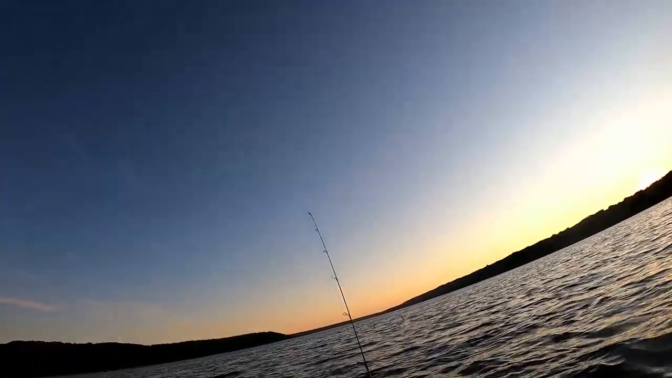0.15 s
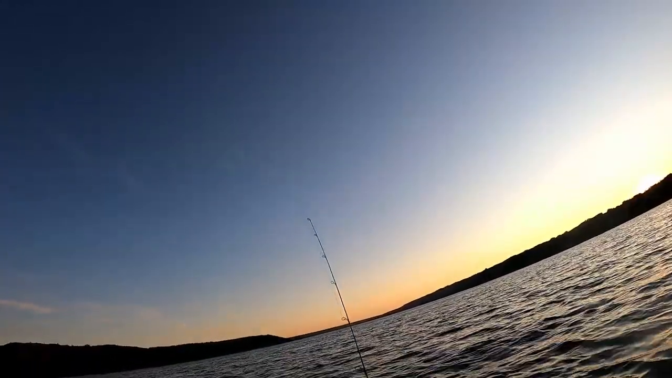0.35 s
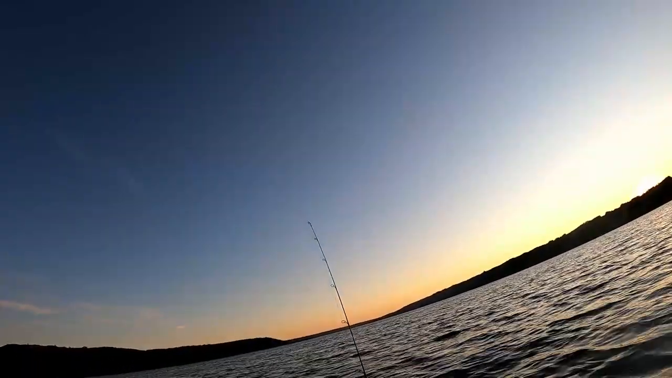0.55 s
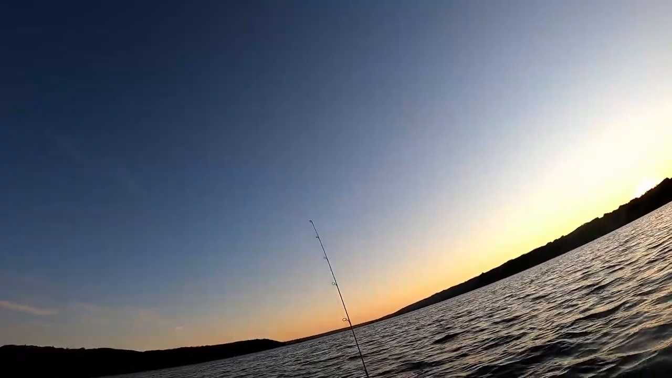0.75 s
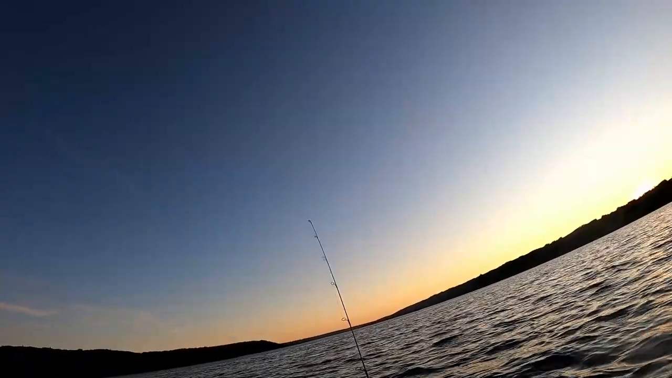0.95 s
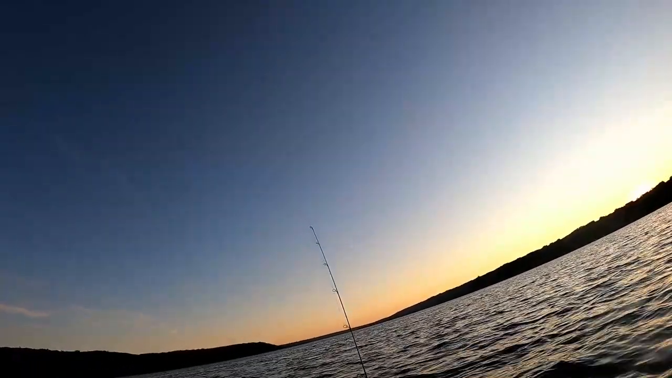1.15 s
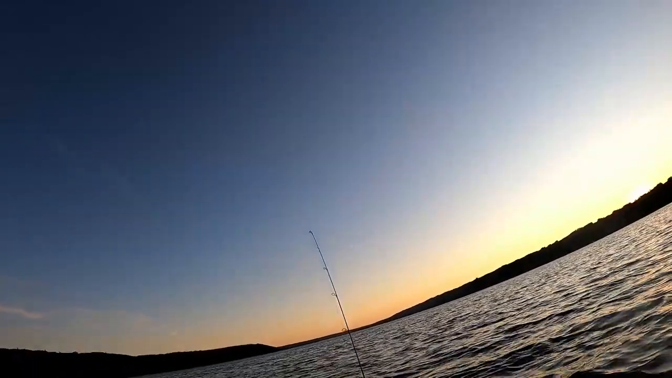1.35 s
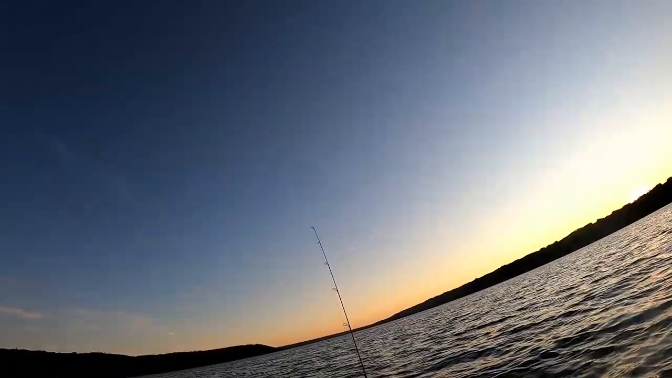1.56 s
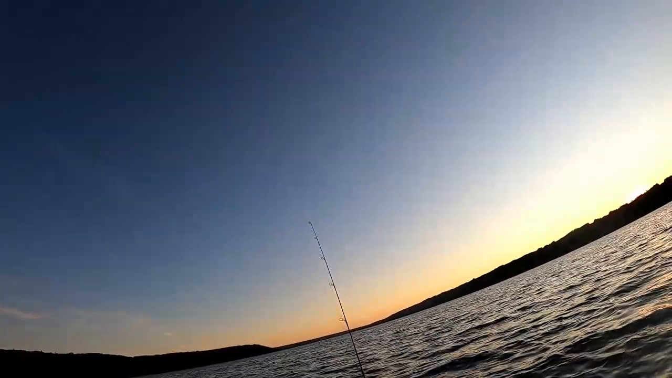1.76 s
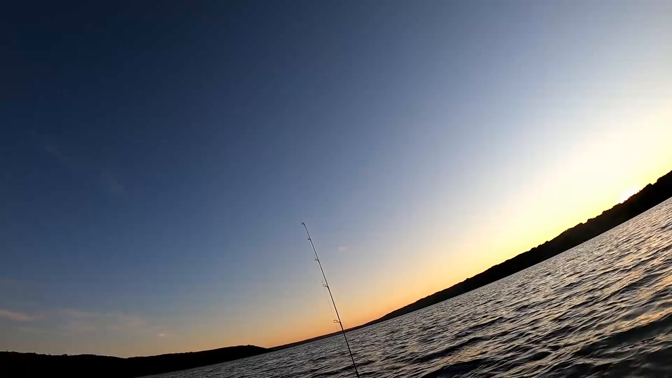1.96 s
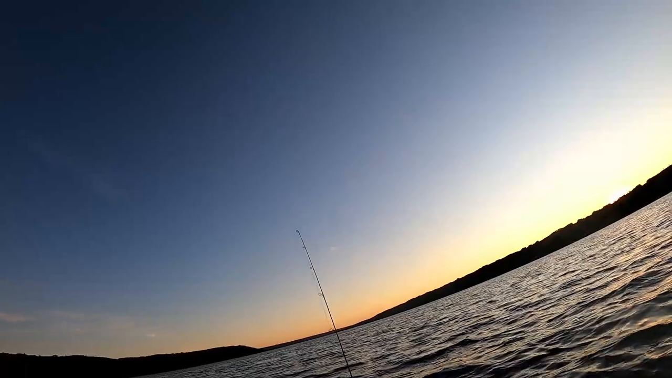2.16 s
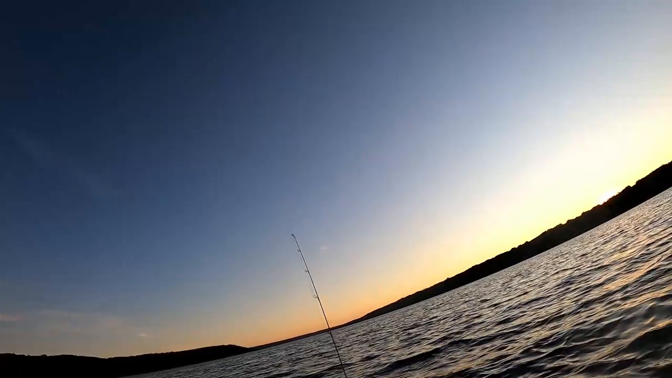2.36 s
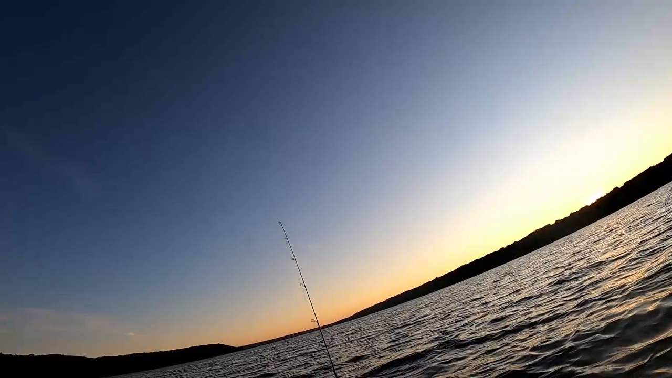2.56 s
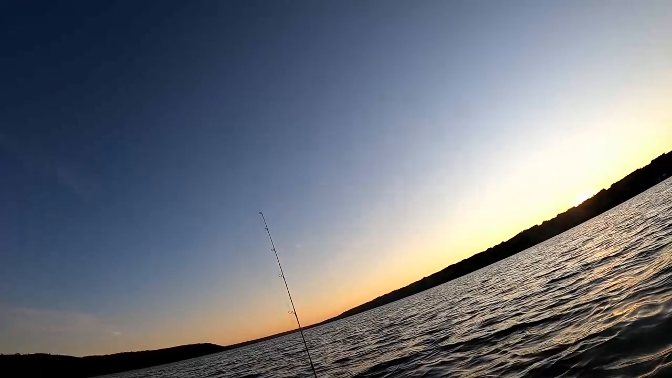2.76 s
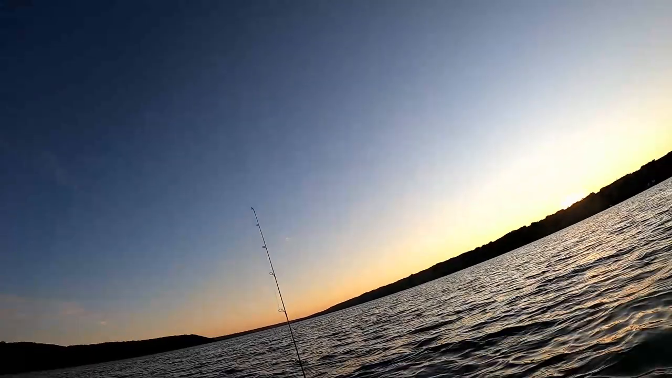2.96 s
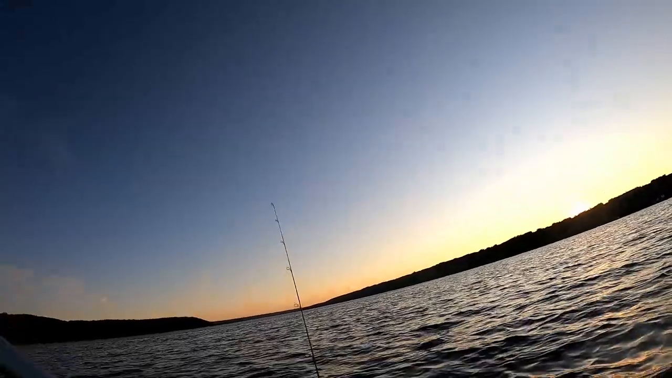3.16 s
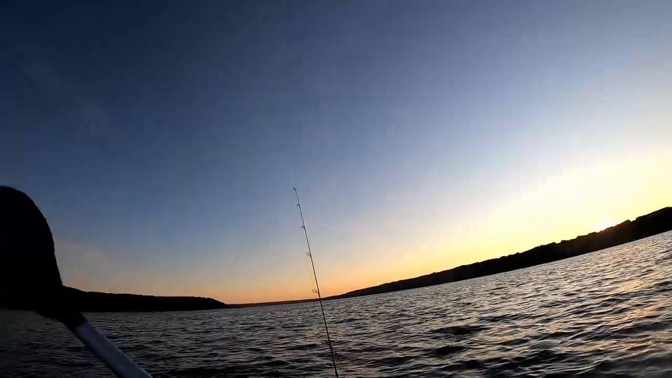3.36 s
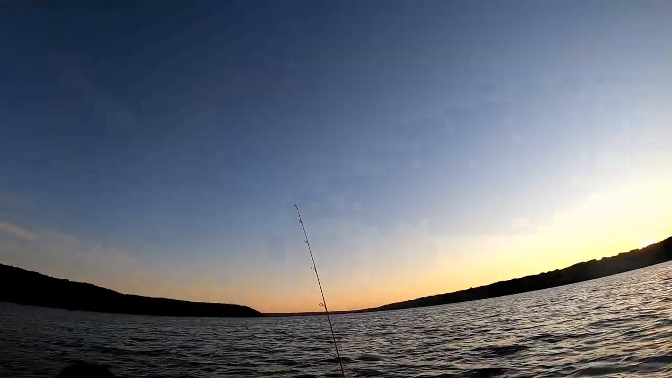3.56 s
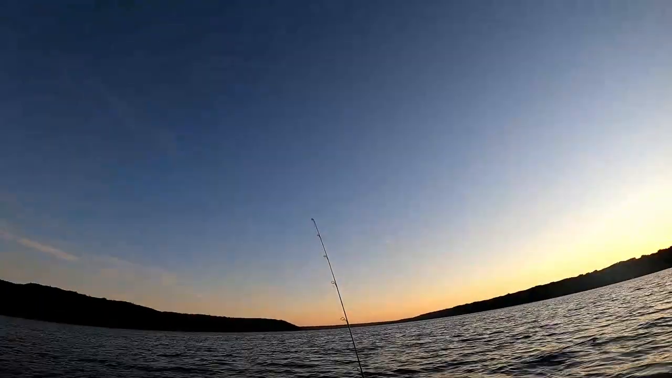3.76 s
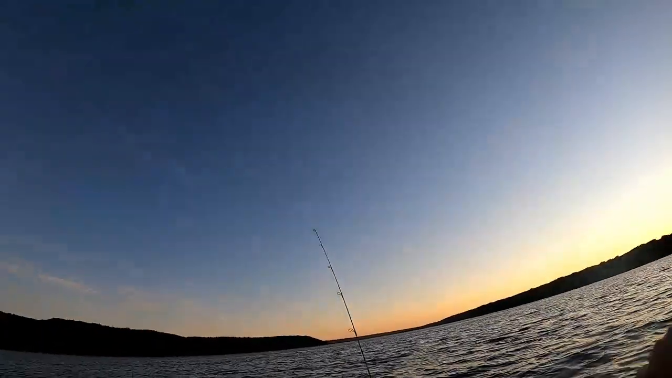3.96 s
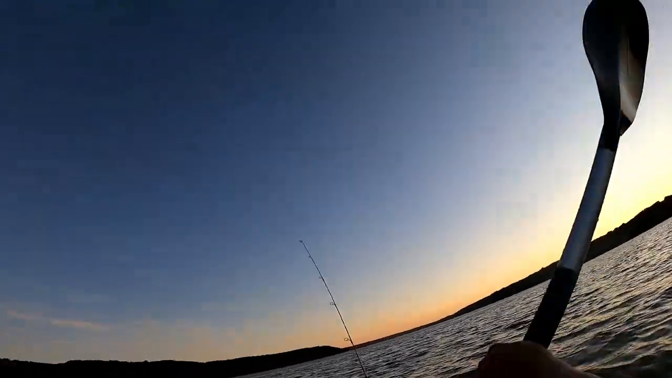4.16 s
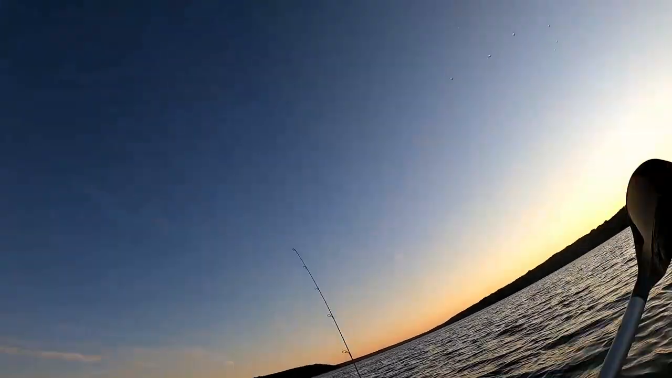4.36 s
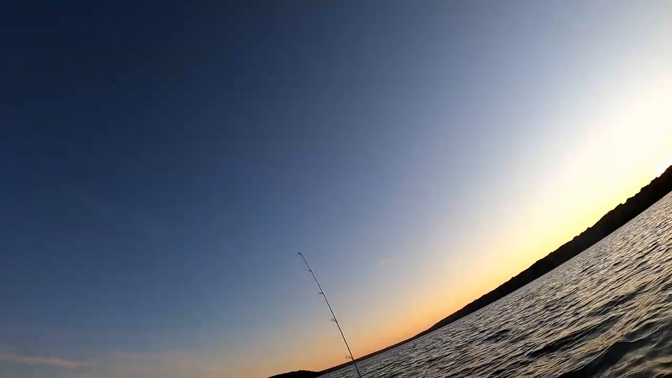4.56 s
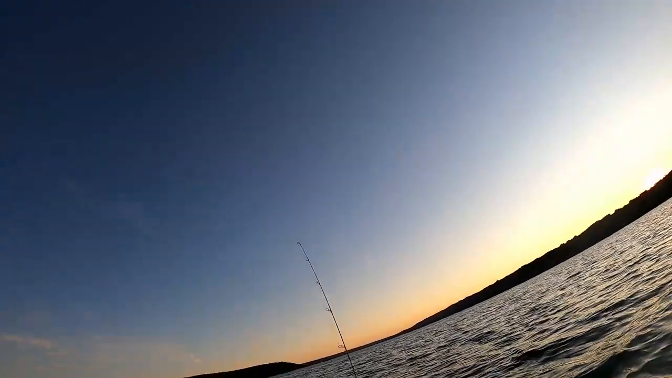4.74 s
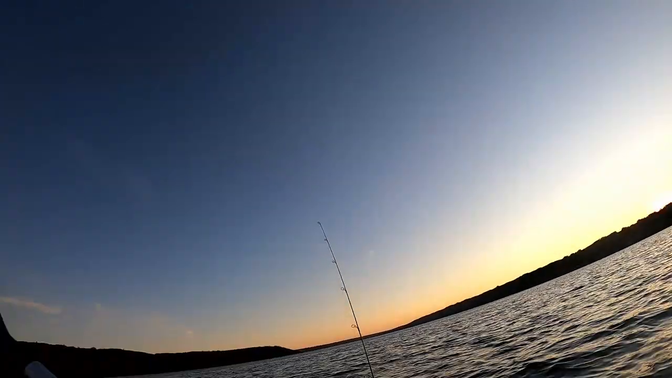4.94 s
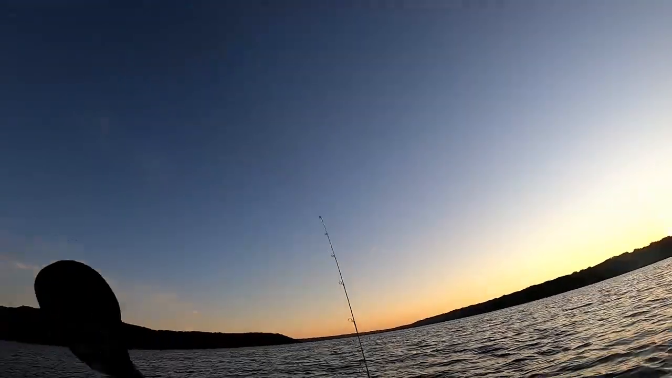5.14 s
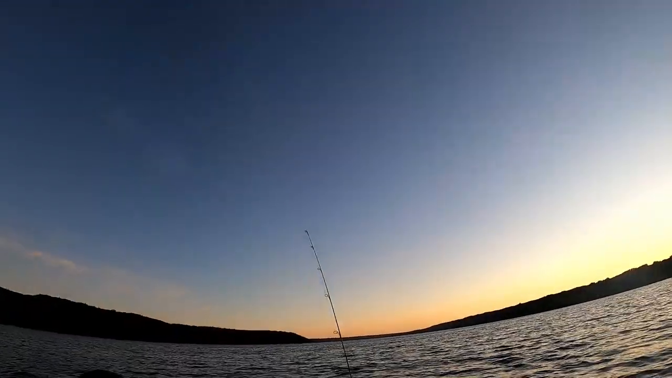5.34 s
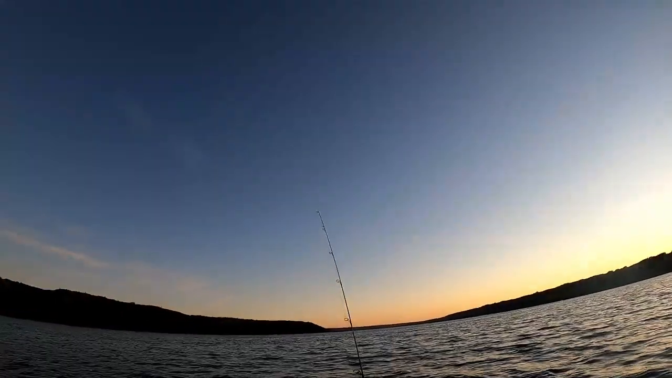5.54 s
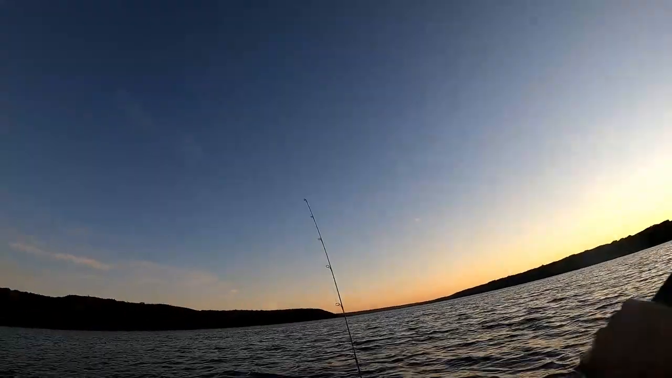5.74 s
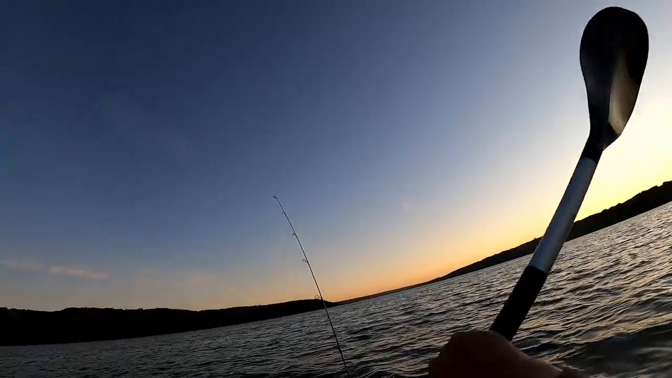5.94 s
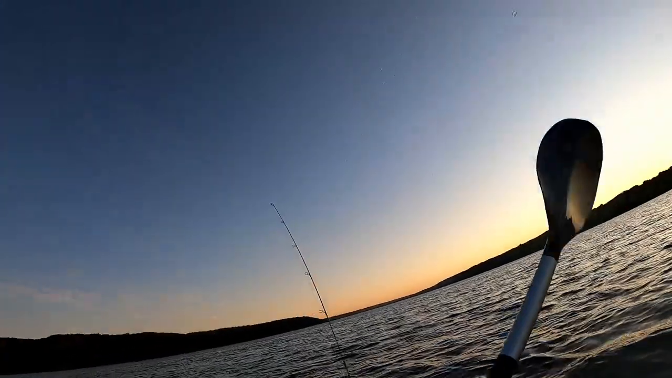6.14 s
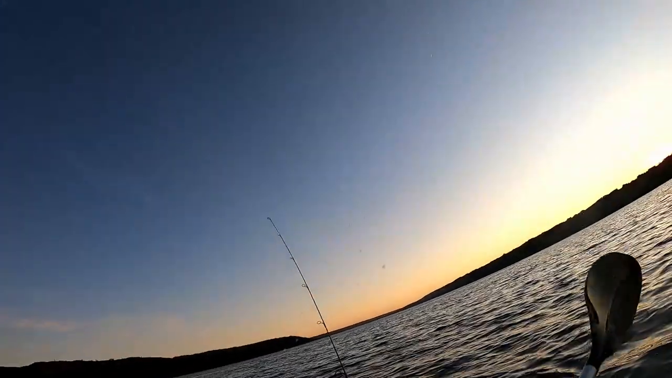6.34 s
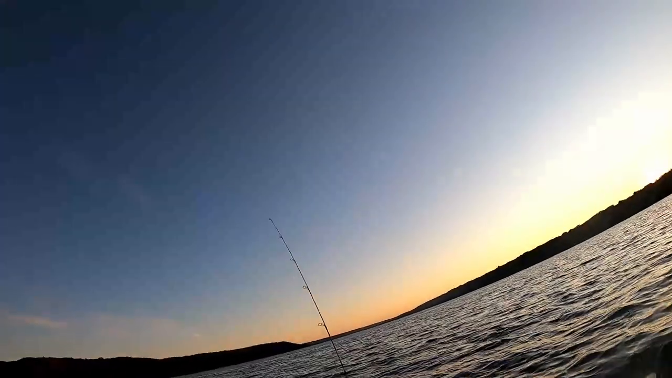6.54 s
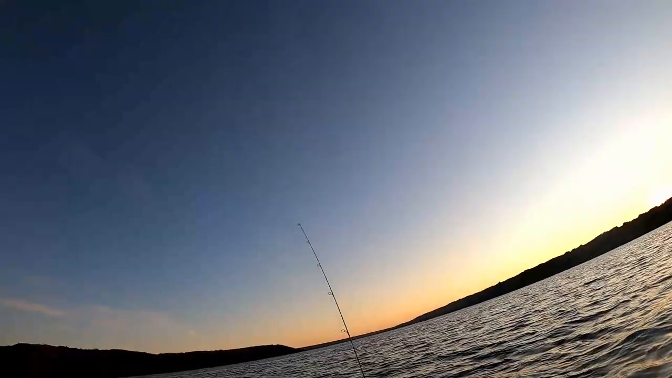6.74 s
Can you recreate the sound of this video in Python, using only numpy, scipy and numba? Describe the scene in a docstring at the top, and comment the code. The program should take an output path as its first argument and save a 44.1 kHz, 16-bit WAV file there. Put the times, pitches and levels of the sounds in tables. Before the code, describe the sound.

A close, slightly dull mono microphone rides on a small inflatable boat on open choppy water, with no echo. From 0 to 3 seconds it drifts quietly: low lumpy wind rumble, faint distant waves, a thin trickle, light drop ticks, and small wavelets lapping with rising bubble plinks. Soft slaps come near 1.3 seconds and a clearer hollow plop at 2.5. Very faint, thin bird whistles sound near 2.0 and 3.1. At 3.25 a slap begins the paddling, and the level jumps. Four strokes surge at roughly 3.8, 4.6, 5.5 and 6.2 seconds, each a deep gurgling churn with fizzy spray, plops and bright drops; drips and knocks fill the easing between them. Wind thumps hard around 4.3 to 4.7 and flutters heavily from 6.0 to 6.8. A strong slap lands at 6.4, then bubbling water continues to the end.

```python
"""Inflatable boat on a choppy lake

Dusk on open water, the microphone aboard a small inflatable that drifts, then is paddled: four strokes.
Wind on the microphone is low noise in lumps; churn and spray are swarms of ringing bubbles over noise.
Close by, lone bubbles ring as gliding sines; drops tick and wavelets slap as short bursts of noise.
Behind them drips trickle, far waves are steady banded noise, and a far bird whistles faint sine notes."""
import sys
import numpy as np
from scipy import signal
from scipy.io import wavfile
from numba import njit

SR = 44100
rng = np.random.default_rng(int(sys.argv[2]) if len(sys.argv) > 2 else 0)


def master(y):
    """Save y as 16-bit WAV."""
    cut = np.clip(np.atleast_2d(y).T, -1, 1)
    pcm = np.round(cut * 32767)  # scale
    wavfile.write(sys.argv[1], SR, pcm.astype(np.int16))


def invert_db(level):
    """Linear amplitude ratio for a level in decibels (20 dB per decade), elementwise."""
    return 10 ** (np.asarray(level, dtype=float) / 20)


N = 304290      # samples
STEP = 40       # samples between points of slow curves


def rms_one(x):
    """Scale to rms 1."""
    return x / np.sqrt(np.mean(x ** 2) + 1e-20)


def in_time(rows):
    """Columns of a curve table at every sample."""
    s, *columns = np.transpose(rows)
    return [np.interp(np.arange(N) / SR, s, column) for column in columns]


def at_hz(spectrum, hz):
    """Read a spectrum on a log-frequency axis."""
    table_hz, table_db = np.transpose(spectrum)
    return np.interp(np.log(hz), np.log(table_hz), table_db)


def drift(rate_hz):
    """Slow random wander of spread 1: noise smoothed by two equal one-pole low-passes."""
    pole = np.exp(-2 * np.pi * rate_hz * STEP / SR)
    noise = rng.standard_normal(N // STEP + 2002)
    slow = signal.lfilter([1], [1, -2 * pole, pole ** 2], noise)[2000:]      # settled part
    return np.interp(np.arange(N) / STEP, np.arange(len(slow)), rms_one(slow))


def swells(steady_db, s, held, db, rise_db_per_s, fall_db_per_s):
    """Level in dB of events that rise, hold and fall away, their power added to a steady level."""
    t = np.arange(0, N, STEP)[:, None] / SR
    before, after = np.maximum(s - t, 0), np.maximum(t - s - held, 0)
    shape_db = db - rise_db_per_s * before - fall_db_per_s * after
    power = np.interp(np.arange(N) / SR, t[:, 0], (invert_db(shape_db) ** 2).sum(axis=1))
    return 10 * np.log10(power + invert_db(steady_db) ** 2)


def banded_noise(spectrum, together_db, patchy_db, rate_hz):
    """Half-octave noise bands that flicker partly together, partly alone; rms 1."""
    out, together = 0, drift(rate_hz)
    lowest, highest = spectrum[0][0], spectrum[-1][0]
    edges = lowest * 2 ** np.arange(0, np.log2(highest / lowest) + .25, .5)
    white = rng.standard_normal((2, N + 8000))      # neighbouring bands take different noise
    for k, (low, high) in enumerate(zip(edges, edges[1:])):
        band_pass = signal.butter(2, [low, min(high, .45 * SR)], "band", fs=SR, output="sos")
        band = signal.sosfilt(band_pass, white[k % 2])[8000:]
        flicker_db = together_db * together + patchy_db * drift(rate_hz)
        out = out + band * invert_db(at_hz(spectrum, np.sqrt(low * high)) + flicker_db)
    return rms_one(out)


@njit
def ring_bubbles(out, at, height, hz, glide, ring_s, attack_cycles):
    """Each bubble is a sine that swells in a cycle or two, dies away and glides in pitch."""
    for k in range(len(at)):
        phase, sixth = 0., ring_s[k] * SR / 6
        for i in range(min(int(4 * sixth), len(out) - at[k])):
            age = i / sixth      # in sixths of the ring setting
            phase += 2 * np.pi * hz[k] * (1 + (glide[k] - 1) * min(age, 2.)) / SR
            swell = 1 - np.exp(-phase / (2 * np.pi * attack_cycles))
            decay = np.exp(-.7 * age - .45 * age ** 2)
            out[at[k] + i] += height[k] * swell * decay * np.sin(phase)


def swarm(per_s, spectrum, cycles, spread_db, rise):
    """Random bubbles at a changing rate, evened in local level, pitches spread over a spectrum; rms 1."""
    at = np.flatnonzero(rng.random(N) < per_s / SR)
    pitch, size, bend, length = rng.random((N, 4))[at].T
    lowest, highest = spectrum[0][0], spectrum[-1][0]
    hz = lowest * (highest / lowest) ** pitch
    # equal chance per octave, so the level per Hz needs 20 log10(hz) to follow the spectrum
    size_db = at_hz(spectrum, hz) + 20 * np.log10(hz) - spread_db * np.log(np.maximum(size, .03))
    out = np.zeros(N)
    ring_s = cycles * (0.27 + length) / hz
    ring_bubbles(out, at, invert_db(size_db) / np.sqrt(per_s[at]), hz, 1 + rise * bend, ring_s, .8)
    return rms_one(out)


def bursts(rows, t60, width):
    """Knocks with noise dying 60 dB in t60 s, in a band from centre / width to centre * width."""
    out, age = np.zeros(N), np.arange(int(.1 * SR)) / SR
    for (s, db, hz), noise in zip(rows, rng.standard_normal((len(rows), len(age)))):
        band = signal.butter(3, [hz / width, min(hz * width, .45 * SR)], "band", fs=SR, output="sos")
        contact = 1.2 * np.sqrt(SR / hz) * (age == 0)      # one sharp click
        splatter = noise * invert_db(-60 * age / t60)
        burst = signal.sosfilt(band, contact + splatter)
        at = round(s * SR)
        out[at:at + len(age)] += invert_db(db) * burst[:N - at] / np.abs(burst).max()
    return out


# light air on the microphone: (frequency [Hz], relative level per Hz [dB])
RUMBLE = [(20, 1), (50, -0.5), (100, -5.5), (200, -16.5), (340, -36.5), (450, -40)]
# strong gusts on the microphone: (frequency [Hz], relative level per Hz [dB])
FLUTTER = [(40, -25.5), (85, 6), (140, 3.5), (210, 0), (300, -8.5), (450, -20.5)]
# gusts over the light air, before eddies: (time at full strength [s], held [s], level [dB])
GUSTS = [(0.0, 0.071, -37.5), (0.27, 0.03, -35.5), (0.58, 0.19, -38), (1.3, .22, -34.5), (1.72, 0.084, -37),
         (1.94, 0.033, -33), (2.04, 0.14, -34.5), (2.2, 0.15, -35), (2.45, 0.046, -33), (2.71, 0.039, -44),
         (3.1, 0.056, -38), (3.3, 0.18, -43), (3.76, 0.033, -31), (4.05, 0.086, -37), (4.31, 0.17, -20.5),
         (4.527, 0.054, -11), (4.64, 0.095, -20), (5.02, 0.015, -30.5), (5.2, .25, -44),
         (5.55, 0.068, -31.5), (5.76, 0.069, -34), (6.04, 0.14, -21), (6.12, 0.15, -18),
         (6.32, 0.014, -18.5), (6.48, 0.14, -17.5), (6.6, 0.22, -21.5)]


def wind():
    """Eddies on the port: lumpy rumble; the stronger the gust, the more of it is faster flutter."""
    wind_db = swells(-40.5, *np.transpose(GUSTS), rise_db_per_s=237, fall_db_per_s=209)
    gusty = 1 / (2.0 + np.exp(-(wind_db + 19.5) / 6.4))      # 0 in light air, towards 0.5 in gusts
    eddies = invert_db(1.87 * drift(27.6))      # each passing eddy moves rumble and flutter in level together
    rumble = banded_noise(RUMBLE, together_db=0.6, patchy_db=3.5, rate_hz=10.2)
    flutter = banded_noise(FLUTTER, together_db=3.0, patchy_db=3.5, rate_hz=16.3)
    return invert_db(wind_db) * eddies * (invert_db(-9.5 * gusty) * rumble + invert_db(3.5) * gusty * flutter)


# low bubbling at the hull: (frequency [Hz], relative level per Hz [dB])
GURGLE = [(150, 8), (250, 3), (420, 2.5), (900, -0.5), (1800, -14.5), (2800, -85)]
# fine spray: (frequency [Hz], relative level per Hz [dB])
SPRAY = [(1200, 5), (2200, 0), (4600, -8), (7000, -18.5), (9500, -17), (12600, -29.5), (15000, -80)]
# slow churn, calm and then four paddle strokes: (time [s], gurgle level [dB], spray level [dB])
CHURN = [(0.0, -53, -61), (0.6, -60, -67.5), (1.15, -64.5, -78), (2.2, -68.5, -92), (2.8, -58, -72.5),
         (3.2, -70, -67), (3.4, -50.5, -67), (3.48, -51, -47.5), (3.74, -31.5, -47), (3.96, -31, -46.5),
         (4.06, -36.5, -46.5), (4.27, -38.5, -48), (4.58, -29, -39.5), (5.03, -42.5, -42.5),
         (5.15, -43.5, -50), (5.34, -35, -43.5), (5.57, -30.5, -50), (5.75, -34.5, -45.5),
         (6.02, -46.5, -57.5), (6.11, -38.5, -40), (6.23, -29.5, -34.5), (6.47, -31, -44),
         (6.8, -36.5, -37.5), (6.9, -45.5, -50.5)]
# single wavelets and splashes breaking on the hull:
# (time at full strength [s], held [s], gurgle level [dB], spray level [dB])
WAVELETS = [(0.138, 0.034, -46, -60), (0.75, 0.052, -52.5, -68.5), (0.89, 0.02, -70, -64.5),
            (1.231, 0.007, -46.5, -62.5), (1.34, 0.046, -42.5, -54.5), (1.556, 0.052, -47.5, -61.5),
            (1.918, 0.02, -56, -72), (2.29, 0.0069, -54, -68), (2.395, 0.022, -47.5, -60.5),
            (2.478, 0.015, -38, -54), (2.719, 0.013, -53, -57), (2.87, 0.11, -57, -81),
            (3.252, 0.039, -35, -48), (4.124, 0.02, -34.5, -44.5), (4.549, 0.016, -39, -65),
            (4.857, 0.0082, -32, -41), (5.113, 0.017, -38.5, -49), (5.917, 0.032, -41.5, -43),
            (6.41, 0.0099, -30, -65)]


def water():
    """The harder the churn, the more bubbles a second; many small ones blur into wash and hiss."""
    gurgle_db, spray_db = in_time(CHURN)
    s, held, gulp_db, splash_db = np.transpose(WAVELETS)
    gurgle_db = swells(gurgle_db, s, held, gulp_db, rise_db_per_s=510, fall_db_per_s=241.5)
    spray_db = swells(spray_db, s, held, splash_db, rise_db_per_s=400, fall_db_per_s=190)
    clumps = invert_db(2.7 * drift(20))
    clump_level = np.sqrt(clumps)      # a clump of bubbles is louder than a lull

    gurgles_per_s = 1300 * invert_db(.3 * (gurgle_db + 40)) * clumps
    gurgle = swarm(gurgles_per_s, GURGLE, cycles=30, spread_db=4.0, rise=.25)
    wash = banded_noise(GURGLE, together_db=2.0, patchy_db=5.5, rate_hz=18.0)
    churn = invert_db(-1.5) * gurgle * clump_level + invert_db(-12.5) * wash

    fizz_per_s = 2600 * invert_db(.4 * (spray_db + 50)) * clumps
    fizz = swarm(fizz_per_s, SPRAY, cycles=24, spread_db=4.1, rise=.2)
    # the smallest bubbles are faint
    fizz = signal.sosfilt(signal.butter(1, 5000, fs=SR, output="sos"), fizz)
    hiss = banded_noise(SPRAY, together_db=2.0, patchy_db=4.0, rate_hz=23.4)
    spray = invert_db(-2.5) * fizz * clump_level + invert_db(-2.5) * hiss
    return invert_db(gurgle_db) * churn + invert_db(spray_db) * spray


# steady trickle off the tubes: (frequency [Hz], relative level per Hz [dB])
DRIPS = [(1000, 11), (1400, 4.5), (2500, -5), (4500, -13)]


def trickle():
    """Small drips ring as bubbles that come in short runs, denser and louder together."""
    runs = invert_db(5.5 * drift(7.9))
    return invert_db(-73) * np.sqrt(runs) * swarm(130 * runs, DRIPS, cycles=50, spread_db=3.5, rise=.12)


# far waves across the lake: (frequency [Hz], relative level per Hz [dB])
LAKE = [(300, 26), (505, -10), (1009, -12), (1427, 3), (2018, -17), (3400, -19), (8200, -20), (10200, -49),
        (15000, -49)]


def lake():
    """Far waves blend into a faint, gently flickering noise."""
    return invert_db(-66) * banded_noise(LAKE, together_db=1.5, patchy_db=1.4, rate_hz=6)


# drops on the taut skin, close by: (time [s], peak level [dB], centre [octaves above 1 kHz])
TICKS = [(0.049, -47, 2.5), (0.142, -35, 0.76), (0.2, -38, 0.68), (0.28, -46, 1.5), (0.512, -58, 2.5),
         (0.571, -52, 2.7), (0.884, -40, 0.72), (1.233, -35, 0.94), (1.6106, -45.5, 2.17),
         (1.764, -48, 1.4), (2.389, -41, 0.68), (2.675, -50, 2.5), (2.6908, -49, 1.9), (2.7156, -32, 1.05),
         (2.7262, -39, 2.3), (2.761, -47.5, 2.2), (3.876, -29, 0.99), (4.2028, -27, 1.14),
         (4.805, -23.5, 1.1), (4.898, -25, 1.2), (4.974, -29.5, 2.5), (5.029, -23.5, 1.2),
         (5.313, -30, 1.75), (5.576, -25, 1.2), (5.91, -25.5, 2.1), (5.915, -27, 2.9), (5.9205, -28.5, 1.2),
         (6.083, -30.5, 2.64), (6.2198, -19, 1.88)]


def ticks():
    """Drops strike the taut skin: very short, bright knocks."""
    rows = [(s, db, 1000 * 2 ** octaves) for s, db, octaves in TICKS]
    return bursts(rows, t60=.012, width=1.6)


# bubbles heard alone: (time [s], level before swell and decay [dB], starting pitch [Hz],
# pitch ratio a sixth into the ring [-], ring [s]); the glide ends at two sixths with twice the change,
# and the decay passes 60 dB at just over half the ring
BUBBLES = [(0.164, -38, 444, 1.18, 0.42), (0.279, -40, 1220, 1.1, 0.037), (0.557, -43, 1370, 1, 0.057),
           (0.719, -45.5, 1740, 1.07, 0.065), (0.885, -42, 1250, 1.2, 0.039),
           (0.958, -46, 1157, 1.06, 0.097), (1.307, -41, 1120, 1.03, 0.077), (1.427, -39, 1740, 0.98, 0.03),
           (1.444, -37.5, 830, 1.9, 0.055), (1.562, -41, 1430, 1.12, 0.043),
           (1.592, -44, 1550, 1.13, 0.058), (1.714, -42.5, 1480, 0.89, 0.02), (1.762, -57, 870, 1.15, 0.2),
           (1.934, -47.5, 1380, 0.99, 0.048), (1.952, -50, 884, 1.35, 0.18), (2.466, -17, 422, 0.89, 0.036),
           (2.509, -26, 1040, 1.3, 0.022), (2.694, -42.5, 1070, 1.03, 0.055), (2.73, -33, 1730, 1, 0.013),
           (2.763, -37.5, 2270, 1.25, 0.033), (2.866, -42.5, 1360, 1.02, 0.044),
           (2.904, -44.5, 1550, 1.33, 0.058), (3.31, -24.5, 620, 1.12, 0.07), (3.411, -42, 780, 1.23, 0.25),
           (3.47, -36.5, 1350, 2, 0.095), (3.52, -31, 1640, 1.16, 0.047), (3.611, -30, 950, 1.55, 0.064),
           (3.777, -25.5, 938, 0.95, 0.11), (3.799, -18.5, 514, 0.45, 0.089),
           (3.898, -20.5, 420, 1.1, 0.031), (3.907, -19, 304, 1.12, 0.051), (3.943, -24, 310, 0.72, 0.11),
           (4.012, -23, 743, 1.05, 0.046), (4.14, -22.5, 169.6, 1.37, 0.32), (4.162, -18, 463, 1.02, 0.027),
           (4.327, -23.5, 444, 0.99, 0.036), (4.868, -16.5, 217, 1.21, 0.072),
           (4.975, -29, 475, 1.2, 0.064), (5.136, -25.5, 890, 1, 0.042), (5.598, -19.5, 447, 1, 0.052),
           (5.287, -27, 1500, 0.9, 0.088), (5.335, -20.5, 508, 1.1, 0.071), (5.51, -28, 1026, 1.06, 0.069),
           (5.556, -17.5, 863, 0.85, 0.072), (5.573, -24, 675, 0.82, 0.16), (5.828, -29, 596, 1.1, 0.049),
           (5.872, -32, 564, 1.6, 0.111), (5.919, -24, 850, 1.06, 0.042), (6.038, -30, 1090, 1.05, 0.032),
           (6.181, -16, 1110, 0.86, 0.015), (6.262, -21, 1160, 0.91, 0.023), (6.287, -22, 895, 0.92, 0.055),
           (6.829, -26.5, 1020, 1.2, 0.049), (6.539, -26.5, 2200, 1.04, 0.021),
           (6.653, -19, 760, 1.2, 0.036)]


def bubbles():
    """Lone bubbles and drips, their ring roughened by the moving surface."""
    s, db, hz, glide, ring_s = np.transpose(BUBBLES)
    out = np.zeros(N)
    ring_bubbles(out, (s * SR).astype(np.int64), invert_db(db), hz, glide, ring_s, .7)
    return out * (1 + .33 * drift(160))


# wavelets slapping the tube, close by: (time [s], peak level [dB], centre [Hz])
SLAPS = [(0.789, -42, 1150), (1.332, -31.5, 1440), (1.34, -28.5, 1200), (1.373, -36, 1300),
         (1.396, -35, 800), (1.416, -49, 1500), (2.092, -44, 800), (2.121, -42, 560), (2.395, -34.5, 1450),
         (2.41, -32, 524), (2.467, -27, 1170), (2.484, -27, 1340), (2.499, -25, 970), (2.519, -29.5, 600),
         (2.657, -41, 490), (2.668, -42, 520), (3.247, -21.5, 1180), (3.29, -19.5, 680), (4.412, -26, 750),
         (4.477, -29, 1200), (4.621, -20, 900), (5.116, -18.5, 1200), (5.636, -31, 560),
         (6.407, -17.5, 685)]


def slaps():
    """Wavelets slap the tube: a sharp contact, then a short splatter, lower than the drops."""
    return bursts(SLAPS, t60=.022, width=1.8)


# far bird: (time [s], length [s], start pitch [Hz], end pitch [Hz], level [dB])
WHISTLES = [(2.03, 0.155, 1544, 1545, -64), (3.064, 0.12, 1870, 1905, -67.5)]


def whistles():
    """Thin, slightly rising sine notes with soft ends."""
    out = np.zeros(N)
    for s, length, start_hz, end_hz, db in WHISTLES:
        hz = np.linspace(start_hz, end_hz, int(length * SR))
        note = np.sin(2 * np.pi * np.cumsum(hz) / SR)
        at = round(s * SR)
        out[at:at + len(hz)] += invert_db(db) * signal.windows.tukey(len(hz), .5) * note
    return out


def scene():
    """Open water: no walls, no echo."""
    near = wind() + water() + trickle() + ticks() + bubbles() + slaps()
    far = lake() + whistles()
    return (near + far)[None]      # one channel


def roll_off(x):
    """The treble ends steeply here."""
    return signal.sosfilt(signal.butter(12, 15680, fs=SR, output="sos"), x)


def record(dry):
    """A housed microphone with a dull top rounds the strongest gusts."""
    rounded = .5 * np.tanh(dry / .5)
    dull = signal.sosfilt(signal.butter(2, 9000, fs=SR, output="sos"), rounded)
    return roll_off(dull)


dry = scene()
out = record(dry)
master(out)
```